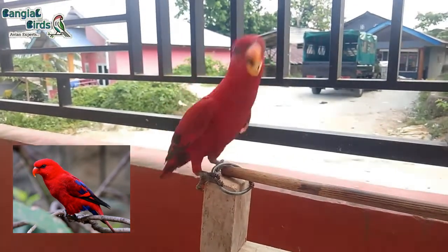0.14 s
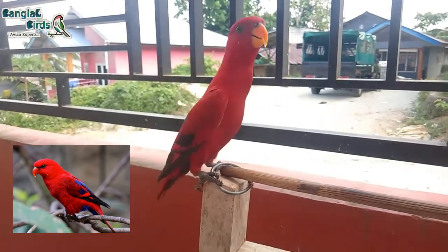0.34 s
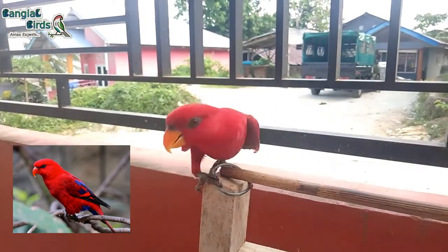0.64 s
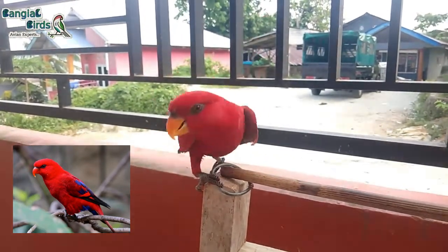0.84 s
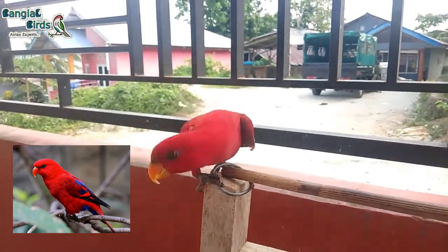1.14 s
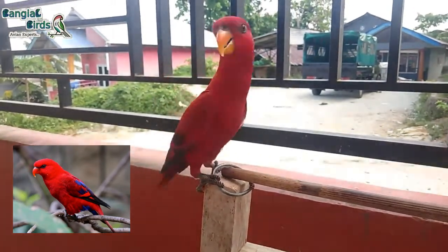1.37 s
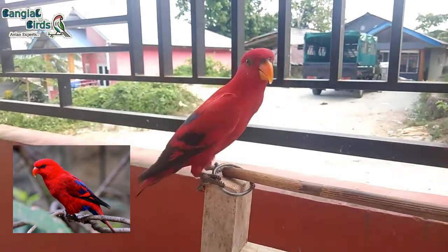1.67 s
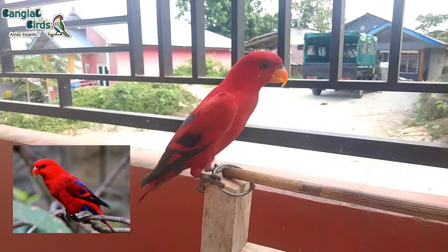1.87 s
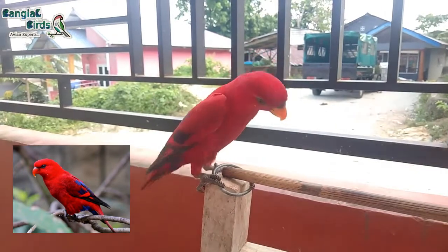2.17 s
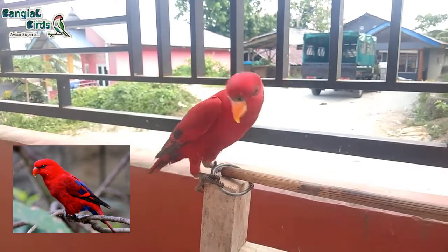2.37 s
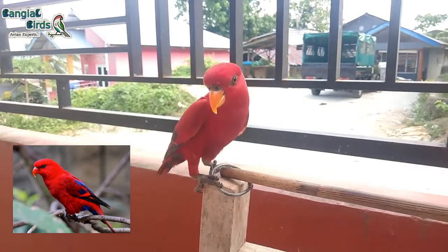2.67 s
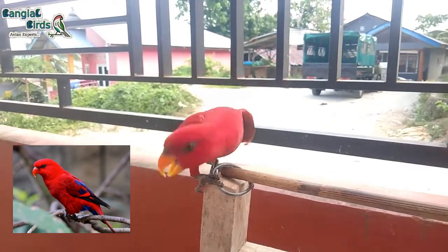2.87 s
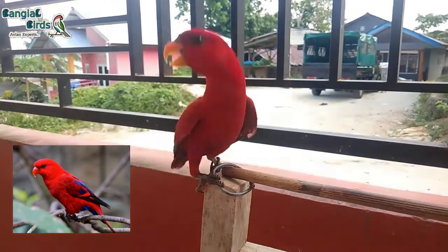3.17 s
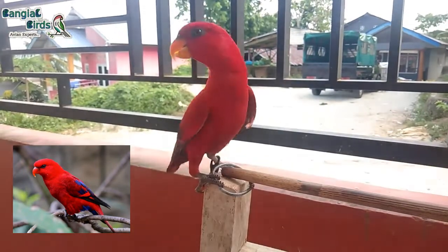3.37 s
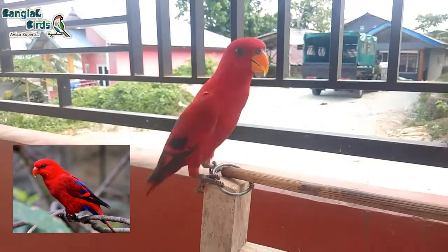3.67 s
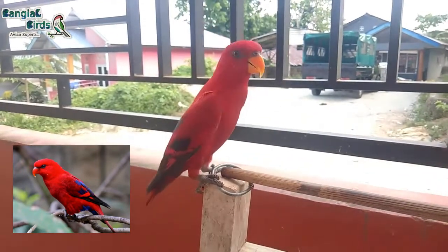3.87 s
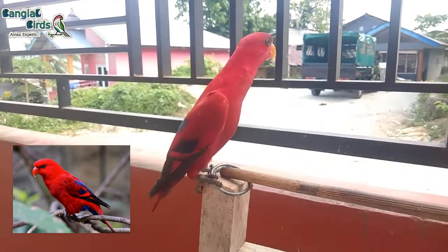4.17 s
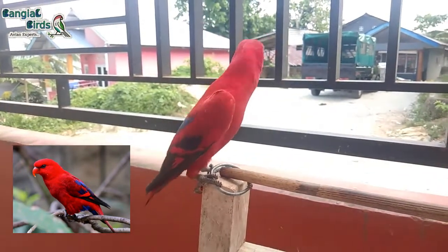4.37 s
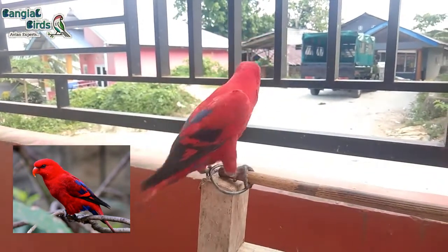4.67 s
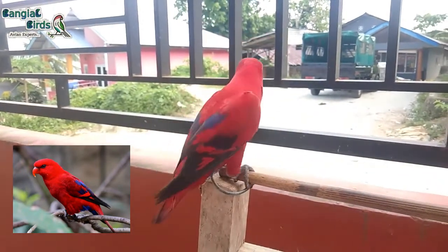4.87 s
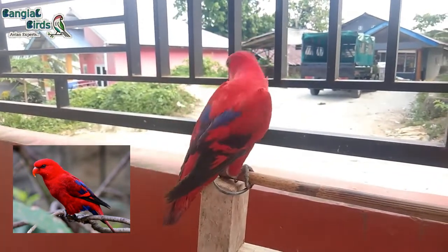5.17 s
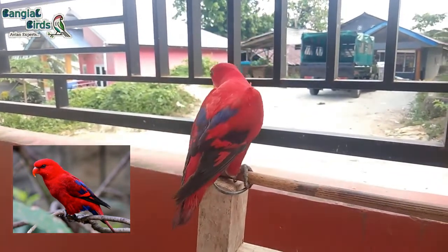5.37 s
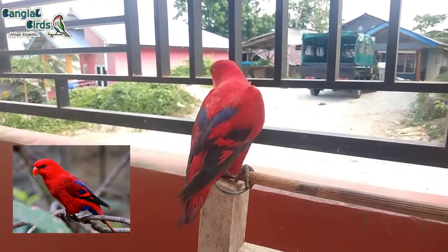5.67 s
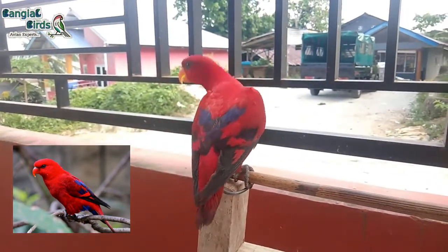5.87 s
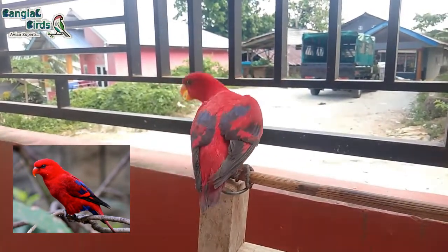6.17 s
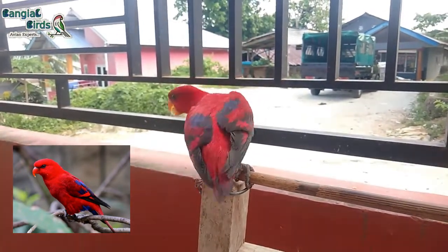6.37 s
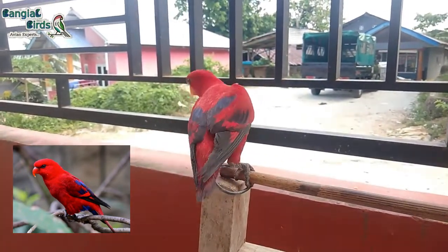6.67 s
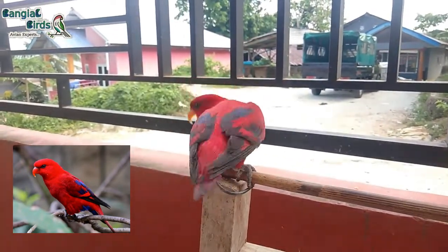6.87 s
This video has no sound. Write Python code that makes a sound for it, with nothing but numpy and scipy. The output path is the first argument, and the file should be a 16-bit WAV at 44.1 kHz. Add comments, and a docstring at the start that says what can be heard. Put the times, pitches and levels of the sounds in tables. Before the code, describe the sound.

A hoarse, distant parrot call opens at 0 s, then a near parrot screeches at 0.15-0.27 s, loud and rasping, its low buzzy notes jumping to a shrill squeal. Far calls answer at about 0.7 and 0.8 s. Similar harsh near bursts come at 0.95 and 1.27 s. A quieter gap holds soft traffic rumble, hiss, a faint wavering motor whine and weak far notes. Two more squawks strike at 2.83 and 3.13 s, and a clearer whistle-like cry rises into a harsh squeal at 4.03 s. Tiny metallic leg-ring ticks follow around 4.6-4.9 s, with one very faint at 5.3; distant calls sound near 5.0 and 5.6 while another motor glides upward. From 5.77 s, screeches crowd together at 6.2, 6.4, 6.65 and 6.9 s. Hard porch walls give each a short, bright tail; the near bird is stronger on the left.

```python
"""A hoarse far call opens, then a lory close by screeches in short bursts on its perch on a hard-walled porch.
Syrinx overtones and air noise pass through throat and beak, and the walls answer each note.
Other lories call from further along the porch, and a leg ring ticks on the perch as a crack and small metal tones.
Below lie a patchy noise rumble of traffic and far motors as gliding whines with a weak octave.
Two phone ports pick it up, the left one facing the bird; the loudest peaks saturate."""
import sys
import numpy as np
from scipy import signal
from scipy.fft import rfft, irfft, next_fast_len
from scipy.io import wavfile
from scipy.ndimage import uniform_filter1d, map_coordinates

SR = 44100
rng = np.random.default_rng(int(sys.argv[2]) if len(sys.argv) > 2 else 0)


def master_out(mix):
    """Clip the mix to full scale and print it as 16-bit PCM to the path in sys.argv[1]."""
    frames = np.transpose(np.atleast_2d(mix))
    ceiling = np.clip(frames, -1, 1)
    pcm = np.round(ceiling * 32767).astype(np.int16)
    wavfile.write(sys.argv[1], SR, pcm)


N = 310464


def amp(db):
    """Amplitude factor of a level in dB."""
    return 10 ** (np.asarray(db) / 20)


def unit(x):
    """x scaled to an RMS of 1."""
    return x / np.sqrt(np.mean(x ** 2) + 1e-20)


def along(points, hz):
    """Values at hz from a curve of (frequency [Hz], value), read on a log frequency axis."""
    f, v = np.transpose(points)
    return np.interp(np.log(hz + 1), np.log(f + 1), v)


def wobble(n, rate):
    """A smooth random curve of n samples, rate knots a second."""
    return map_coordinates(rng.standard_normal(int(n * rate / SR) + 4), [np.arange(n) * rate / SR])


def filtered(x, response):
    """x shaped by a real or complex response of frequency."""
    m = next_fast_len(x.shape[-1] + 2048)
    spectrum = rfft(x, m) * response(np.fft.rfftfreq(m, 1 / SR))
    return irfft(spectrum, m)[..., :x.shape[-1]]


def add(out, x, s):
    """Mix stereo x into out from time s [s]."""
    part = out[:, round(s * SR):][:, :x.shape[1]]
    part += x[:, :part.shape[1]]


# Notes of the near bird: (start [s], end [s], start pitch [Hz], middle pitch [Hz], end pitch [Hz],
# level [dB], swell from start to end [dB], roughness [0-1], beak resonance [Hz])
NEAR_NOTES = [ (0.154, 0.159, 996, 1004, 1010, -6, -4.5, .65, 4210),
              (0.172, 0.183, 1058, 1080, 1084, -5, 5.5, 0.2, 3855),
              (0.187, 0.211, 1083, 976.4, 991, -1, 3.5, 0.18, 4860),
              (0.217, 0.243, 4110, 3896, 3932, 2, -3.5, 0.51, 4590),
              (0.243, 0.268, 4603, 4550, 4400, 1, -4.5, .2, 4500),
              (0.948, 0.988, 661.7, 655.5, 612, -0.5, -3, .22, 5800),
              (0.987, 1.018, 953, 1016, 966, -3, -3.5, .3, 4510),
              (1.025, 1.073, 4857, 4734, 4640, 0, -10.5, .2, 4800),
              (1.265, 1.287, 1080, 1130, 1031, -4, 2, .3, 5400),
              (1.288, 1.349, 1013, 927.4, 956, 0, 0, 0.22, 4830),
              (1.349, 1.387, 4690, 4714, 4670, 1.5, -11.5, 0.23, 4650),
              (2.83, 2.858, 1092, 1330, 1310, -4.5, -1, .2, 4420),
              (2.856, 2.885, 1280, 1080, 948, -7, 0.5, 0.19, 4400),
              (2.887, 2.919, 955, 1033, 1022, -6, 3, 0.25, 6000),
              (2.92, 2.962, 4057, 3851, 3753, -0.5, -10.5, .45, 4230),
              (3.134, 3.161, 1012, 1192, 1020, -4, -2.5, 0.24, 4510),
              (3.16, 3.181, 1021, 972, 925, -8, -2, 0.11, 5020),
              (3.18, 3.208, 930, 1005, 1036, -6.5, 5, 0.11, 5650),
              (3.209, 3.225, 990, 974, 955, -1.5, -4, .5, 4810),
              (3.226, 3.241, 3747, 3737, 3990, -0.5, -5, .3, 3830),
              (4.027, 4.105, 2317, 2187, 1977, -10.5, 1.5, 0.028, 3590),
              (4.113, 4.133, 3166, 3253, 3555, -5.5, 4, 0.058, 3300),
              (4.133, 4.141, 5575, 5836, 6150, -4, -5, 0.17, 5900),
              (4.14, 4.156, 5320, 5277, 5390, -3.5, -5, 0.14, 5220),
              (4.156, 4.185, 4497, 5018, 3450, -2.5, -4.5, .32, 4650),
              (5.766, 5.833, 2567, 2357, 2357, -10.5, -7, .06, 4930),
              (5.842, 5.854, 2324, 2344, 2450, -9.5, -7, .12, 4570),
              (5.857, 5.883, 3442, 3630, 3555, -10, -7, .4, 4180),
              (5.885, 5.908, 5600, 5817, 4365, -4.5, -1.5, .3, 5770),
              (5.909, 5.94, 3550, 3734, 3776, -10, -6.5, 0.41, 4320),
              (6.177, 6.239, 870, 990, 878, -12.5, -2, 0.42, 4000),
              (6.239, 6.253, 2743, 2741, 2723, -3, 1, 0.35, 5580),
              (6.259, 6.301, 3700, 3817, 3804, -10.5, -10.5, .45, 4640),
              (6.426, 6.451, 3120, 2930, 2810, -5, -5, .16, 6350),
              (6.454, 6.483, 950, 957.5, 983, -8, 0, 0.32, 5360),
              (6.484, 6.509, 1340, 1332, 1341, -10, -1, .35, 4320),
              (6.511, 6.552, 4670, 4610, 4800, -7, -8, 0.22, 5000),
              (6.657, 6.674, 2160, 2487, 3170, -8.5, -10.5, .12, 5460),
              (6.679, 6.72, 2357, 2672, 2900, -10.5, -4.5, .38, 5470),
              (6.72, 6.77, 2888, 2881, 2942, -10.5, -3.5, .45, 6050),
              (6.879, 6.936, 3110, 3183, 3146, -7, -2.5, .06, 4700),
              (6.938, 6.97, 4213, 3800, 4385, -6.5, 1, .38, 4050),
              (6.97, 7.013, 4730, 4720, 4670, -7, -8.5, .3, 4610), ]
# How the near bird is turned for each screech, before the squeal trims: (start [s], room sound [dB],
# first partial lift [dB], treble lift [dB], shading of the right port [0-1], left port lag [ms])
BIRD_FACING = [(.15, -5, -2, 0, .5, 0.045), (.94, -6.5, 1, -4.5, .5, 0.095),
               (1.26, -8.5, 0.5, -5.5, 0.69, .09), (2.82, -6, 17, 0.5, .8, .36),
               (3.13, -4, 13.5, -1.5, .7, .36), (4.02, -4.5, 13, 11.5, 0.7, 0.073),
               (5.76, 1, 14.5, 10.5, .5, .07), (6.17, 0, 9, 2.5, 0.23, 0.085),
               (6.42, -1, 3.5, 4, 0.3, .075), (6.65, -2.5, -5.5, 5, 0.5, 0.11),
               (6.87, -0.5, 3, 0.5, 0.44, .075)]
SQUEAL_HZ = 3300  # notes above this are squeals
SQUEAL_ROOM_DB, SQUEAL_TREBLE_DB = -1, -7.5  # squeals beam forward and carry less treble
RISE_MS, CLEAN_RISE_MS = 1.5, 11.2  # onset of a note; added for a wholly clean one
CLEAN_BELOW = .1  # roughness under which a note starts softly


def near_bird():
    """The room's share follows the way the bird faces; the walls get less of the tone and more of the air noise."""
    out = np.zeros((2, N))
    for start, end, *hz, db, swell_db, rough, beak in NEAR_NOTES:
        facing = [row for row in BIRD_FACING if row[0] <= start][-1]
        _, room_db, first_db, treble_db, shading, lag_ms = facing
        rise_ms = RISE_MS + CLEAN_RISE_MS * np.clip(1 - rough / CLEAN_BELOW, 0, 1)
        if hz[1] > SQUEAL_HZ:
            room_db += SQUEAL_ROOM_DB
            treble_db += SQUEAL_TREBLE_DB
        times = [start, (start + end) / 2, end]
        levels = [db - swell_db / 2, db, db + swell_db / 2]
        tone, air = lory_note(times, hz, levels, rough, beak, first_db, 0, treble_db,
                              breaks=.08, flutter=.1, breath=1.1, rise_ms=rise_ms)
        scattered = amp(-3) * tone + amp(3) * air
        room = amp(room_db) * porch(scattered, gap_ms=4)
        add(out, ports(tone + air, shading, lag_ms, room), start)
    return out


# Throat colour: (frequency [Hz], relative level [dB])
THROAT_COLOUR = [(300, -39), (1000, -17), (1600, -22.5), (2400, -11.5), (3500, 1.5), (5000, -2.5),
                 (6600, -0.5), (8500, -4.5), (10000, -10), (11800, -9), (15500, -21.5)]
VOICE_HZ = 3400  # low notes are subharmonics of a voice near this pitch
VOICE_DB = 2.5  # the voice's own overtones over the subharmonics between them
TOP_PARTIAL_HZ = 17000


def lory_note(s, hz, db, rough, beak, first_db, bass_db, treble_db, breaks, flutter, breath, rise_ms):
    """Syrinx overtones and turbulent air through throat and beak; roughness unsettles pitch and size and adds air."""
    t = np.arange(s[0], s[-1], 1 / SR)
    hz, db = np.interp(t, s, hz), np.interp(t, s, db)
    rough = np.clip(rough, 0, 1)

    def colour(f, centre):
        bass = bass_db * np.clip(3 - f / 1300, 0, 1)
        treble = treble_db * np.clip(f / 2500 - 3.4, 0, 1)
        beak_peak = 9 / (1 + ((f - centre) / 600) ** 2)
        return amp(along(THROAT_COLOUR, f) + bass + treble + beak_peak)

    unsteady = breaks * wobble(len(t), 120) + flutter * wobble(len(t), 700)  # slow and fast pitch scatter
    unsteady *= np.clip(hz / 3000, .4, 1)  # low notes hold their pitch better
    phase = 2 * np.pi * np.cumsum(hz * (1 + rough * unsteady)) / SR

    k = np.arange(1, int(TOP_PARTIAL_HZ / hz.min()) + 1)[:, None]
    fading = np.array([wobble(len(t), 60) for _ in k])  # overtones come and go one by one
    slope_db = -0.84 * np.log2(k) * (hz > 3000)
    sizes = colour(k * hz, beak) * (k * hz < TOP_PARTIAL_HZ)
    sizes *= amp((3.0 + 7.45 * rough) * fading + slope_db)
    sizes[0] *= amp(first_db * (hz < 2700))  # a low first partial leaves through the body as well
    voice_step = max(round(VOICE_HZ / hz.mean()), 1)
    sizes *= amp(VOICE_DB * (k % voice_step == 0))

    tone = np.sum(sizes * np.sin(k * phase + 0.44 * k * k), axis=0)
    tone /= np.sqrt(np.sum(sizes ** 2, axis=0) / 2)  # even power before the rough flutter
    tone *= amp(3.4 * rough * wobble(len(t), 346.5))
    air = unit(filtered(rng.standard_normal(len(t)), lambda f: colour(f, beak)))
    air_share = np.clip(breath * rough, 0, 1) ** 2  # of the power
    rise, fall = (t - s[0]) * 1000 / rise_ms, (s[-1] - t) / 0.00068
    edges = np.clip(np.minimum(rise, fall), 0, 1)
    return np.array([np.sqrt(1 - air_share) * tone, np.sqrt(air_share) * air]) * amp(db) * edges


# Full shading of the right port, behind the phone: (frequency [Hz], level [dB])
RIGHT_SHADE = [(500, -10), (2400, -6.5), (4400, -12), (8000, -25.5), (15000, -27)]


def ports(x, shading, lag_ms, room):
    """Direct sound, late at the left port and shaded at the right, plus the room."""
    x = np.pad(x, (0, room.shape[1] - len(x)))

    def pickup(hz):
        left = np.exp(-2j * np.pi * hz * lag_ms / 1000)
        right = amp(shading * along(RIGHT_SHADE, hz))
        return [left, right]

    return room + filtered(x, pickup)


# Decay of the porch: (frequency [Hz], time to fall 60 dB [s])
PORCH_DECAY = [(800, 0.26), (2600, 0.43), (4500, 0.47), (7000, 0.47), (14000, 0.39)]
# Room sound at the right port against the left: (frequency [Hz], level [dB])
PORCH_RIGHT_TONE = [(1000, -0.5), (2400, -3.5), (4400, -2), (8000, -9), (15000, -15.5)]
WALL_BASS_DB = -4.5  # the walls return less below 1.5 kHz


def porch(x, gap_ms):
    """The walls' answer, unrelated at the two ports; each frequency dies at its own speed."""
    hz, t, z = signal.stft(rng.standard_normal((2, SR * 3 // 4)), SR, nperseg=256)
    side_db = np.array([0 * hz, along(PORCH_RIGHT_TONE, hz)])
    side = amp(side_db + WALL_BASS_DB * (hz < 1500))[:, :, None]
    uneven = uniform_filter1d(rng.standard_normal(z.shape), size=3, axis=1)
    uneven = uniform_filter1d(uneven, size=8, axis=2)
    z *= amp(3.5 * unit(uneven))  # the walls answer in patches
    decay = amp(-60 * t / along(PORCH_DECAY, hz)[:, None])
    tail = signal.istft(z * side * decay, SR, nperseg=256)[1]
    tail *= 1 - np.exp(-np.arange(tail.shape[1]) / (SR * gap_ms / 1000))  # reflections build up
    return signal.fftconvolve(x[None], tail / np.linalg.norm(tail[0]), axes=1)


# Far notes: (start [s], end [s], start pitch [Hz], peak pitch [Hz], end pitch [Hz],
# peak level before distance [dB], share of the note before the peak [0-1], roughness [0-1],
# beak resonance [Hz], bass lift [dB], treble lift [dB])
FAR_NOTES = [ (0, 0.063, 3460, 3460, 3296, -15.5, 0.012, .4, 6850, -18, 8),
             (0.668, 0.733, 3455, 3830, 3506, -13.5, .45, 0.39, 7000, -15, 6.5),
             (0.801, .9, 3750, 3400, 3150, -17, .45, .5, 6170, -8, 3.5),
             (2.097, 2.3, 2070, 2075, 2046, -57, .4, .05, 2080, 26, -10),
             (2.402, 2.722, 935, 932, 935, -27, 0.66, .3, 5200, -26, -2),
             (4.984, 5.032, 6640, 6690, 6630, -20.5, .2, 0.38, 6450, -14, 19),
             (5.068, 5.121, 2060, 2074, 1970, -36.5, .4, 0.32, 2100, 13, 8),
             (5.399, 5.578, 2085, 2240, 2260, -54, 0.5, 0.076, 2200, 25.5, -10),
             (5.621, 5.762, 3377, 3280, 3470, -12.5, .3, .33, 6670, -8.5, 12), ]
FAR_SWELL_DB, FAR_FADE_DB, FAR_RISE = 6, 13, 0.044  # up to the peak, after it; onset as a share of the note
FAR_DIRECT_DB, FAR_ROOM_DB = -8.5, -4.5


def far_birds():
    """Far calls are hoarse and arrive mostly by way of the walls."""
    out = np.zeros((2, N))
    for start, end, *hz, db, before, rough, beak, bass_db, treble_db in FAR_NOTES:
        peak = start + np.clip(before, .01, .99) * (end - start)
        levels = [db - FAR_SWELL_DB, db, db - FAR_FADE_DB]
        tone, air = lory_note([start, peak, end], hz, levels, rough, beak, 0, bass_db, treble_db,
                              breaks=.04, flutter=.16, breath=.12, rise_ms=1000 * FAR_RISE * (end - start))
        voice = tone + air
        room = amp(FAR_ROOM_DB) * porch(voice, gap_ms=0.99)
        call = ports(amp(FAR_DIRECT_DB) * voice, shading=0.2, lag_ms=0.18, room=room)
        add(out, call, max(start, 0))
    return out


# Ticks of the ring on the perch: (time [s], relative level [dB], direct sound left minus right [dB])
RING_TICKS = [(4.5788, -40, 22), (4.6862, -40.5, 22), (4.7132, -37, 21), (4.7391, -31, 18.0),
              (4.8738, -57, 9), (5.3339, -50.5, 7)]
# Tones of the leg ring: (frequency [Hz], mean relative level [dB], time to fall 60 dB [s])
RING_TONES = [(6100, -12, 0.024), (8750, -11.5, 0.013), (12600, -24, 0.015)]


def leg_ring():
    """Each tick is a short crack and a brief ring of small metal, its tones struck unevenly."""
    out, t = np.zeros((2, N)), np.arange(SR // 20) / SR
    for s, db, pan_db in RING_TICKS:
        ring = np.zeros(len(t))
        for hz, level, t60 in RING_TONES:
            fall = amp(level + rng.normal(0, 4.7) - 60 * t / t60)
            ring += fall * np.sin(2 * np.pi * hz * t)
        crack = filtered(rng.standard_normal(len(t)), lambda f: np.clip(f / 6000, 0, 1) ** 2)
        crack *= amp(0.5 - 60 * t / 0.0061)
        tick = amp(db + 8.5) * (ring + crack)
        room = amp(-13.5) * porch(tick, gap_ms=6)
        direct = np.pad(tick, (0, room.shape[1] - len(t))) * amp([[0], [-pan_db]])
        add(out, direct + room, s)
    return out


# Colour of rumble and hiss: (frequency [Hz], relative level per Hz [dB])
STREET_COLOUR = [(20, -14.5), (40, -11.5), (52, 3), (63, 7.5), (78, -6), (130, -9), (230, -17.5),
                 (550, -18), (950, -21.5), (1200, -25), (2200, -29), (3000, -34), (14000, -43),
                 (15200, -58)]
# Likeness of the two ports: (frequency [Hz], left-right correlation [-1 to 1])
PORT_LIKENESS = [(60, 0.99), (180, 0.93), (550, 0.33), (1650, -0.12), (4970, 0.14), (15000, -0.3)]
# Balance of the ports: (frequency [Hz], left minus right [dB])
PORT_BALANCE = [(200, 0), (2400, 0.5), (8000, 7), (15000, 0)]
STREET_DB = -46  # middle of a slowly wavering level


def street():
    """Patchy traffic rumble, alike at both ports in the bass, with microphone hiss on top."""
    z = signal.stft(rng.standard_normal((2, N)), nperseg=512)[2]
    patches = uniform_filter1d(rng.standard_normal(z.shape[1:]), 4, axis=0)
    patches = uniform_filter1d(patches, 16, axis=1)
    pair = signal.istft(z * amp(1.8 * unit(patches)), nperseg=512)[1][:, :N]

    def mid_side(hz):
        turn = np.arccos(np.clip(along(PORT_LIKENESS, hz), -1, 1)) / 2  # sets the correlation
        return amp(along(STREET_COLOUR, hz)) * [np.cos(turn), np.sin(turn)]

    mid, side = filtered(pair, mid_side)
    both = np.array([mid + side, mid - side])
    both = filtered(both, lambda hz: amp(along(PORT_BALANCE, hz) * [[.5], [-.5]]))
    return amp(STREET_DB + 0.86 * wobble(N, 7.8)) * unit(both)


# Far motors, one table each, as centres of a small waver: (time [s], pitch [Hz], level [dB])
MOTOR_WHINES = [
    [(0, 723.5, -59), (.4, 739, -52), (.9, 742, -51), (1.5, 714.4, -63), (1.9, 720, -52.5), (2.7, 720, -58),
     (3.3, 793, -58.5), (3.6, 790, -60.5), (4.2, 796, -63.5), (4.6, 900, -61), (5, 800, -70),
     (5.3, 781, -83.5)],
    [(4.8, 287, -92), (5, 346, -58.5), (5.3, 534.5, -62.5), (5.55, 644, -61), (5.8, 747, -89.5)],
]


def motor():
    """Far, slightly unsteady whines with a weak octave."""
    out, t = np.zeros((2, N)), np.arange(N) / SR
    for rows in MOTOR_WHINES:
        s, hz, db = np.transpose(rows)
        pitch = np.interp(t, s, hz) + 6 * wobble(N, 30)
        phase = 2 * np.pi * np.cumsum(pitch) / SR
        waver_db = 1.5 * np.array([wobble(N, 12), wobble(N, 3.2)])  # left, right
        level = amp(np.interp(t, s, db) + waver_db)
        octave = 0.31 * np.sin(2 * phase + [[0], [2.2]])
        out += level * (np.sin(phase + [[0], [.8]]) + octave)
    return out


def scene():
    """The near bird over its neighbours, the ring, the street and the motors."""
    return near_bird() + far_birds() + leg_ring() + street() + motor()


TOP_HZ = 15640  # middle of the steep upper band edge


def record(dry):
    """The input saturates near full scale; the recorder blocks the lowest bass and all above its band limit."""
    clipped = dry / (1 + np.abs(dry / .9) ** 12) ** (1 / 12)

    def band(hz):
        top = np.clip((TOP_HZ + 60 - hz) / 120, 0, 1)
        bass_cut = hz ** 4 / (hz ** 4 + 58 ** 4)
        return top * bass_cut

    return np.clip(filtered(clipped, band), -1, 1)


dry = scene()
out = record(dry)
master_out(out)
```